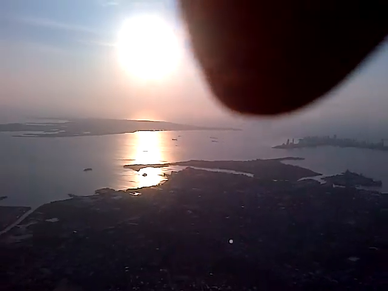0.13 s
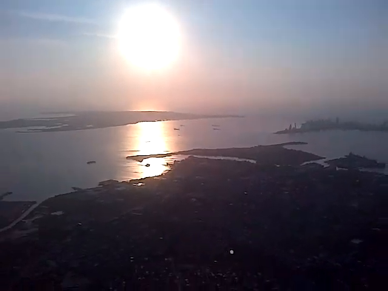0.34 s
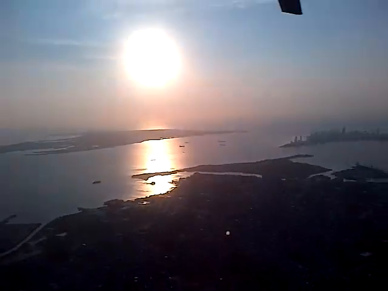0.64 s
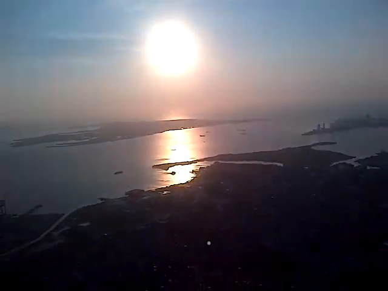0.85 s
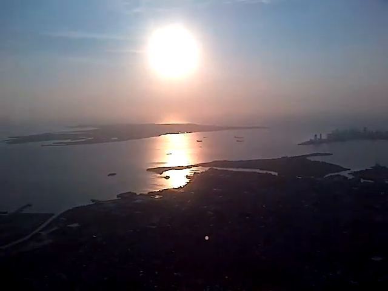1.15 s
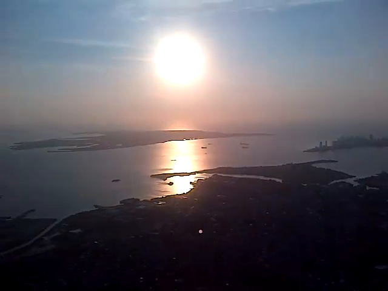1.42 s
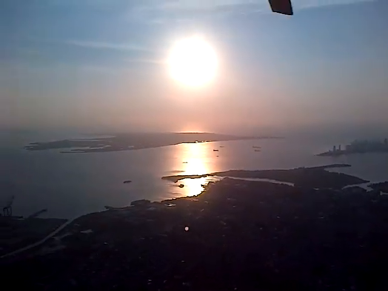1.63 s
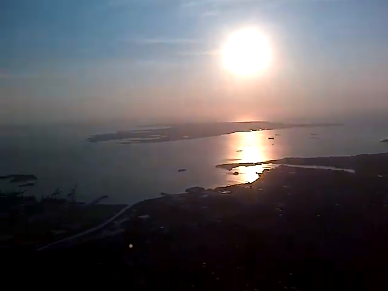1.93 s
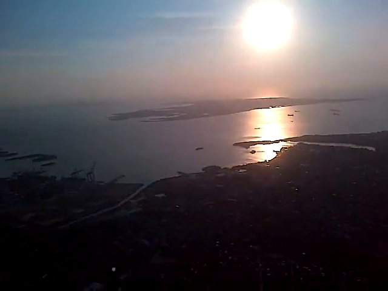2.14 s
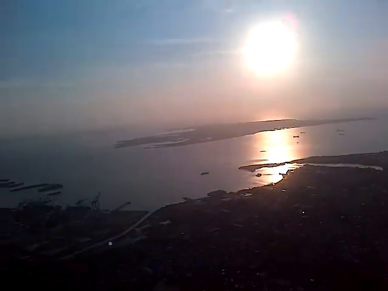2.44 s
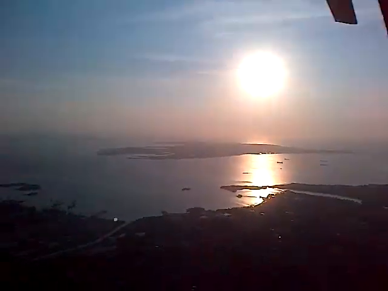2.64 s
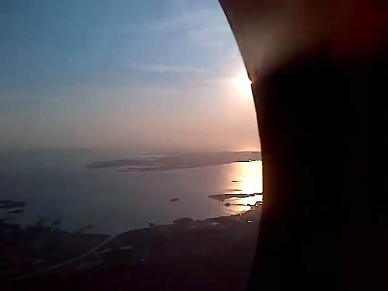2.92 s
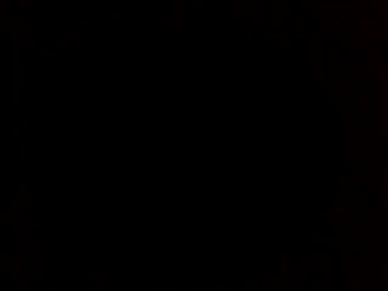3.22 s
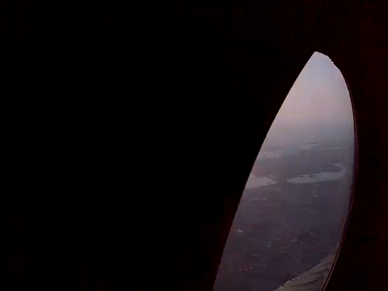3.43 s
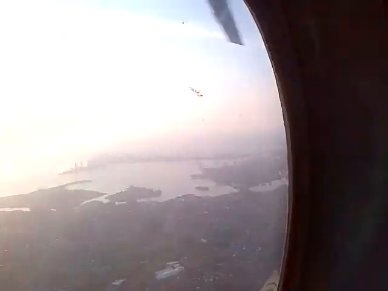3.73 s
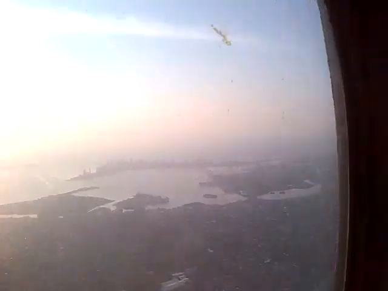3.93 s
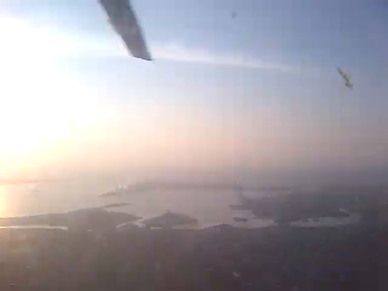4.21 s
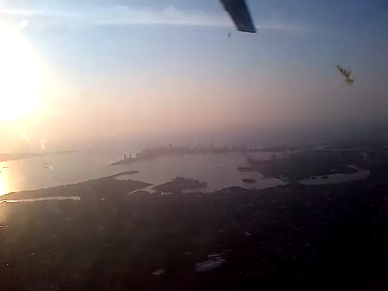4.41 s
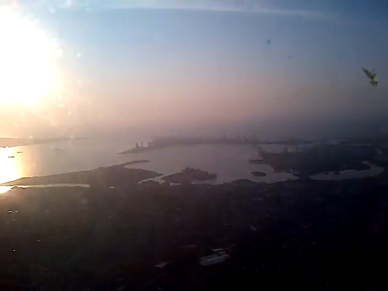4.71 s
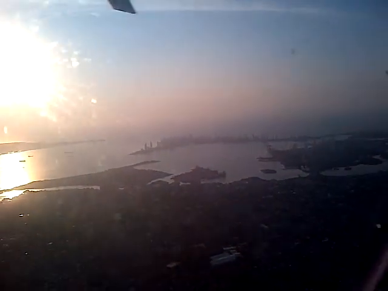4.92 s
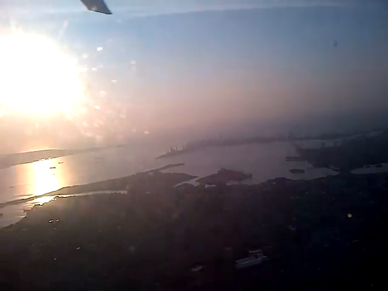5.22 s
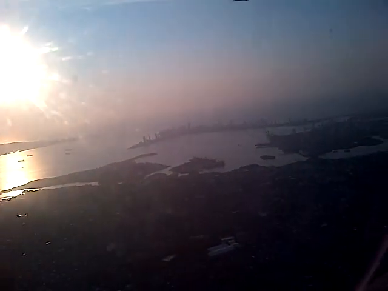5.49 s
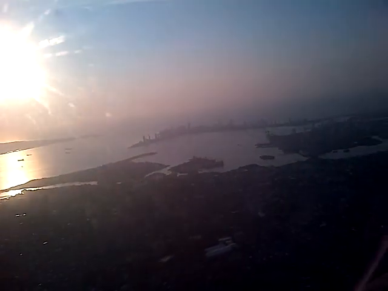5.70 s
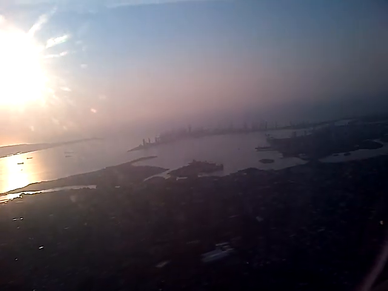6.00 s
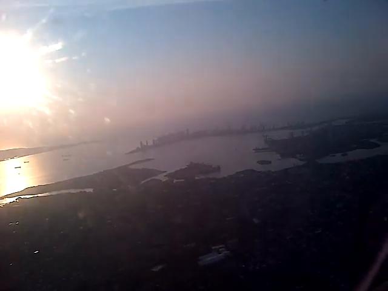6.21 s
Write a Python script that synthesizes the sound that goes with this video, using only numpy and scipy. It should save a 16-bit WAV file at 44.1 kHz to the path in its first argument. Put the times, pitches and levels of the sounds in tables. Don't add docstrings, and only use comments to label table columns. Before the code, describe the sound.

Harsh wind overload squeals and crackles on a phone microphone for three seconds, then steady helicopter rotor thump, hiss and whine inside the cabin.

```python
import sys
import numpy as np
from scipy import signal
from scipy.fft import rfft, irfft
from scipy.io import wavfile
from scipy.ndimage import uniform_filter1d

SR = 44100
rng = np.random.default_rng(int(sys.argv[2]) if len(sys.argv) > 2 else 0)


def invert_db(level):
    return 10 ** (np.asarray(level, dtype=float) / 20)


def unload_wav(signal):
    wavfile.write(
        sys.argv[1],
        SR,
        np.round(np.clip(np.atleast_2d(signal).T, -1, 1) * 32767).astype(np.int16),
    )


N = 280035
RATE = 16000
M = N * RATE // SR + 1
RAIL = 0.37
BASS_CUT_HZ = 118
# (frequency [Hz], gain [dB])
TREBLE = [(1000, -1), (2500, -1), (4000, -2), (5500, -8), (6500, -15), (7300, -28.5), (7750, -48)]


def unit(x):
    return x / np.sqrt(np.mean(x ** 2))


def shape(table, hz):
    table_hz, db = np.transpose(table)
    return np.interp(np.log(hz + 1), np.log(table_hz), db)


def colour(x, gain):
    hz = np.arange(len(x) // 2 + 1) * RATE / len(x)
    return irfft(rfft(x) * gain(hz), len(x))


def walk(rate_hz):
    k = int(RATE / rate_hz)
    steps = np.repeat(rng.standard_normal(M // k + 1), k)
    return unit(uniform_filter1d(uniform_filter1d(steps, k), k)[:M])


def air(table, flicker_db, rate_hz):
    low_hz, high_hz = table[0][0], table[-1][0]
    out = 0
    for hz in low_hz * 2 ** np.arange(0, np.log2(high_hz / low_hz) + .5, .5):
        def band(f):
            octaves = np.clip(np.log2((f + 1) / hz), -.5, .5)
            return invert_db(shape(table, f)) * np.cos(np.pi * octaves)
        out = out + invert_db(flicker_db * walk(rate_hz)) * colour(rng.standard_normal(M), band)
    return unit(out)


def tone(hz, drift, wobble_db):
    phase = 2 * np.pi * (np.cumsum(hz * (1 + drift * walk(6))) / RATE + rng.random())
    return np.sqrt(2) * np.sin(phase) * invert_db(wobble_db * walk(9))


def gear_tones(t):
    # (frequency [Hz], level [dB])
    window_tones = [(936.7, -38.5), (995.9, -44), (1023, -34), (1367, -35.5), (1593, -48.5), (1733, -33),
                    (1776, -37.5), (1873, -37), (1906, -35), (1992, -41.5), (2083, -33), (2207, -39.5),
                    (2503, -36.5), (2632, -47), (2794, -40), (3128, -46.5), (3413, -41.5), (3731, -45.5)]
    # (frequency [Hz], level [dB])
    pillar_tones = [(694.4, -35.5), (942.1, -33), (1373, -54), (1739, -40.5), (1782, -49), (1879, -43),
                    (2213, -38.5), (2433, -52.5), (2805, -44.5)]
    window = np.interp(t, [3.8, 4.2], [0, 1])
    pillar = np.interp(t, [2.9, 3.3], [.4, 1]) * (1 - window)
    gears = window * sum(invert_db(db) * tone(hz, .001, 1.9) for hz, db in window_tones)
    return gears + pillar * sum(invert_db(db) * tone(hz, .0008, 0.48) for hz, db in pillar_tones)


def airflow(calm):
    # (frequency [Hz], density [dB per Hz])
    calm_hiss = [(220, -20.5), (380, 1), (660, -1.5), (870, -8.5), (1010, -4.5), (1160, -9.5), (1390, -5),
                 (1630, -6.5), (1740, -8), (2560, -7), (6330, -38.5), (7090, -51), (7640, -99.5),
                 (9930, -128), (16800, -120)]
    # (frequency [Hz], density [dB per Hz])
    windy_hiss = [(220, -28), (380, -5), (962, -9), (1320, -15.5), (1420, -15.5), (1690, -14.5),
                  (3170, -18.5), (5870, -40), (6910, -50.5), (7640, -77.5), (9930, -103), (16800, -120)]
    return calm * air(calm_hiss, 1.3, 11) + (1 - calm) * air(windy_hiss, 1.5, 25.26)


def rotor(t, calm):
    # (multiple of blade rate, level [dB])
    slap_harmonics = [(5, -25.5), (7, -7.5), (8, -23.5), (9, -7.5), (10, -3), (11, 0.5), (12, -12),
                      (13, -10.5), (14, -7.5), (15, 0), (16, -10), (17, -16.5), (18, -7.5), (20, -12)]
    # (frequency [Hz], density [dB per Hz])
    rumble = [(24, -66), (60, -12.5), (130, -14.5), (166, -2), (220, -7), (249, -7), (285, -10.5),
              (341, -3.5), (398, -24), (480, -16.5), (620, -48.5), (1060, -120)]
    # (frequency [Hz], density [dB per Hz])
    buffeting = [(24, -38), (40, -8), (91, -7.5), (171, -4.5), (209, -8), (247, -2.5), (390, -8),
                 (480, -14), (620, -30.5), (1060, -120)]
    blade_hz, blade_lag_turns, tail_hz = 16.362, .34, 255.5
    turn = 2 * np.pi * (blade_hz * t - blade_lag_turns + 0.0071 * walk(5))
    slaps = 0
    for k, db in slap_harmonics:
        slaps = slaps + invert_db(db + 2.2 * walk(3)) * np.cos(round(k) * turn + .2 * rng.standard_normal())
    gate = 1 + .5 * np.cos(turn)
    boom = invert_db(-2) * unit(slaps) + invert_db(-3) * gate * air(rumble, 1.4, 5.4)
    boom += invert_db(-4.0) * tone(tail_hz, .003, 2.9)
    return calm * boom + (1 - calm) * air(buffeting, 0.64, 32)


def cabin(t, calm, boom_db):
    change_db = boom_db + 20
    hiss_db = calm * (-25.5 + 0.52 * change_db) + (1 - calm) * (-22 + 0.55 * change_db)
    return invert_db(boom_db) * rotor(t, calm) + invert_db(hiss_db + 1.5) * airflow(calm) + gear_tones(t)


def before_recorder(x):
    def gain(f):
        bass = np.sqrt(1 + (BASS_CUT_HZ / np.maximum(f, 60)) ** 4)
        return bass * invert_db(-np.maximum(shape(TREBLE, f), -24))
    return colour(x, gain)


def spans(table, t):
    return sum((t >= s) & (t < s + ms / 1000) for s, ms in table) > 0


def pushes():
    # (start [s], rise [ms], hold [ms], fall [ms], top pitch [Hz])
    long_pushes = [(0, .1, 342, 7, 3700), (.059, 19, 30, 72, 7700), (.159, 23, 1, 140, 5900),
                   (.405, 2, 25, 5, 1350), (.49, 4, 4, 7, 1800), (.506, 1, 4, 2, 1100),
                   (.51, 6, 1, 45, 2900), (.584, 33, 27, 33, 7700), (.681, 8, 9, 6, 1600),
                   (.952, 25, 4, 24, 7700), (.999, 25, 3, 34, 7500), (1.167, 5, 15, 5, 1500),
                   (1.202, 28, 38, 26, 4250), (1.332, 4, 5, 4, 1450), (1.438, 32, 36, 10, 3300),
                   (1.525, 4, 78, 16, 2050), (2.395, 1, 10, 2, 750), (2.468, 34, 3, 22, 7900),
                   (2.49, 10, 32, 19, 4800), (2.616, 60, 47, 79, 8200), (2.869, 4, 9, 4, 1200),
                   (2.989, 66, 96, 65, 8300)]
    # (start [s], length [ms], top pitch [Hz])
    brief_taps = [(.361, 6, 1150), (.37, 4, 550), (.386, 4, 780), (.396, 5, 700), (.455, 6, 850),
                  (.942, 10, 950), (1.063, 5, 1300), (1.728, 5, 900), (2.214, 5, 450), (2.341, 5, 600),
                  (2.854, 5, 900), (3.272, 11, 1100)]
    hold_share = .55
    as_pushes = [(s, .1, hold_share * ms, (1 - hold_share) * ms, hz) for s, ms, hz in brief_taps]
    return [(s, rise / 1000, hold / 1000, fall / 1000, hz)
            for s, rise, hold, fall, hz in long_pushes + as_pushes]


def excess(t):
    wrap_pops = [
        .879,
        1.093,
        2.207,
        2.582,
    ]
    # (time [s], pitch shift [Hz])
    pitch_jolts = [(.015, -1300), (.023, -1100), (.029, -2100), (.038, 900), (.05, -1500), (.122, -1200),
                   (.13, 1100), (.168, -1600), (.208, -1500), (.22, 1300), (.231, 1300), (.249, -900),
                   (.268, 1300), (.303, 800), (.428, 1200), (.59, -600), (1.186, 800), (1.232, 700),
                   (1.247, -800), (1.441, -700), (1.45, 700), (1.457, -800), (1.486, 2100), (1.555, 1200),
                   (1.6, 1100), (2.521, 900), (2.637, 700), (2.768, -900), (2.992, -600), (3.03, -600)]
    entry_hz, exit_hz, bow, jolt_ms = 1000, 400, .85, 5
    hz = np.zeros(M)
    for s, rise, hold, fall, top in pushes() + [(s, .0001, .001, .001, 900) for s in wrap_pops]:
        push = np.interp(t, s + np.cumsum([0, rise, hold, fall]), [1e-6, 1, 1, 1e-6], 0, 0)
        base = np.where(t < s + rise, min(entry_hz, top), exit_hz)
        hz = np.maximum(hz, (push > 0) * (base + (top - base) * push ** bow))
    bend = sum(d * np.clip(1 - 1000 * abs(t - s) / jolt_ms, 0, 1) for s, d in pitch_jolts)
    return np.where(hz > 0, np.maximum(hz + bend, 300), 0)


def squeal(t):
    # (time [s], shake [Hz])
    boom_shake = [(0, 560), (.3, 480), (.45, 380), (.7, 230), (2.45, 250), (2.6, 220), (3.3, 170)]
    shake_hz = np.interp(t, *np.transpose(boom_shake))
    hz = excess(t)
    on = hz > 0
    shake = shake_hz * (.1 * walk(130) + .9 * walk(520) + .4 * walk(1200))
    hz = hz + np.minimum(hz / 1500, 1) * (shake + 450 * rng.standard_normal(M))
    phase = 2 * np.pi * np.cumsum(on * np.clip(hz, 300, RATE / 2)) / RATE
    wave = np.sin(phase + 0.35 * np.sin(phase))
    folded = colour(rng.standard_normal(M), lambda f: f / (f + 300))
    wave += invert_db(-14) * (shake_hz / 200) ** 0.64 * np.clip(hz / 2600, .4, 1) * folded
    return on, invert_db(-6.0 + 2.67 * np.clip(1 - (hz - 1200) / 900, 0, 1)) * wave


def port_pressure(t):
    # (time [s], heave re rail [dB])
    wind_heave = [(0, 0), (.5, 0), (.75, -6), (1.1, 0), (1.5, -4), (1.65, -8), (1.95, -7), (2.25, 0),
                  (2.6, 1), (2.85, 1), (2.92, -6), (2.97, 1), (3.26, 2), (3.3, -30)]
    # (start [s], length [ms])
    pinned_spans = [(.4456, 4.3), (.8242, 6.7), (1.0976, 9.8), (1.1475, 4.8), (1.159, 4.3), (1.4064, 9.2),
                    (1.8534, 6.7), (1.9711, 3.9), (2.0459, 5.1), (2.1208, 3.6), (2.1886, 8.1),
                    (2.2505, 13.3), (2.2799, 4.3), (2.2944, 4.8), (2.3069, 9.5), (2.4141, 4.2),
                    (2.4256, 4.8), (2.4341, 6.1), (2.5703, 10.3), (2.5857, 8.8), (2.5972, 14.8),
                    (2.8082, 10.3), (2.8426, 7.8), (2.9369, 9.7), (2.9629, 8.8), (2.9743, 15.8),
                    (3.2198, 23.9), (3.2447, 5.8), (3.2617, 6.3)]
    heave = invert_db(np.interp(t, *np.transpose(wind_heave))) * (.42 + .4 * walk(35) + .5 * walk(170))
    edges = [(s - .004, 1000 * sum(parts_s) + 5.5) for s, *parts_s, _ in pushes()]
    pinned = uniform_filter1d(1. * spans(pinned_spans + edges, t), size=20)
    return RAIL * (heave + 5 * pinned)


def scene():
    # (time [s], level [dB])
    cabin_level = [(0, 2.5), (.8, -20), (1.4, -20), (1.7, -23), (2.05, -16), (2.4, -19), (2.9, -25.5),
                   (3.3, -30), (3.5, -28.5), (3.7, -24.5), (4, -20), (4.3, -18), (4.7, -15.5), (5.2, -18),
                   (5.7, -17), (6.35, -18)]
    # (start [s], length [ms])
    locked_spans = [
        (.622, 1.5),
        (.627, 3),
        (2.504, 2),
        (2.672, 26),
        (2.7035, 2.5),
        (2.711, 20),
        (3.042, 28),
        (3.077, 54.5),
        (3.1335, 24.5),
    ]
    t = np.arange(M) / RATE
    calm = np.interp(t, [3.25, 3.35], [0, 1])
    sound = before_recorder(cabin(t, calm, np.interp(t, *np.transpose(cabin_level))))
    rail = RAIL * (1 + 5 * calm)
    heard = np.clip(sound + port_pressure(t), -rail, rail) + invert_db(-40.5) * sound
    on, wave = squeal(t)
    heard = np.where(on, wave * ~spans(locked_spans, t) + 0.33 * RAIL, heard)
    heard += invert_db(-47.5) * (abs(t - 3.12) > .04) * rng.standard_normal(M)
    return signal.resample_poly(heard, SR, RATE)[None, :N]


def low_pass(x):
    return signal.sosfilt(signal.butter(12, 7790, fs=SR, output="sos"), x)


def record(dry):
    x = signal.sosfilt(signal.butter(2, BASS_CUT_HZ, "high", fs=SR, output="sos"), dry)
    x += invert_db(-10.5) * signal.sosfilt(signal.butter(1, [18, 45], "band", fs=SR, output="sos"), dry)
    hz = np.arange(N // 2 + 1) * SR / N
    x = irfft(rfft(x) * invert_db(shape(TREBLE + [(9000, -76.5)], hz)), N)
    x = .85 * np.tanh(x / .85)
    return low_pass(x)


dry = scene()
out = record(dry)
unload_wav(out)
```